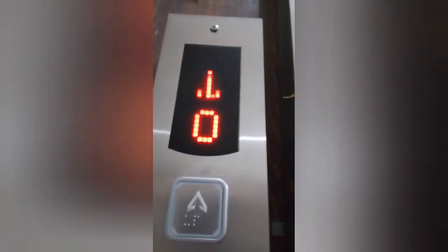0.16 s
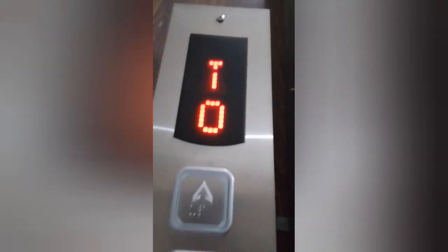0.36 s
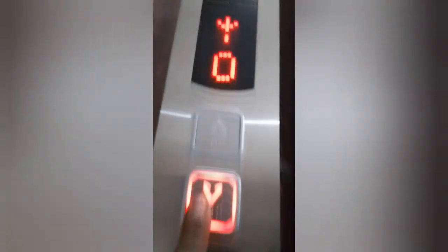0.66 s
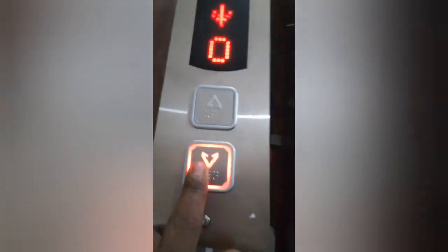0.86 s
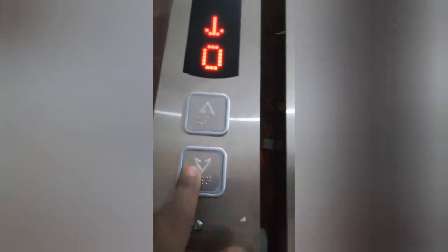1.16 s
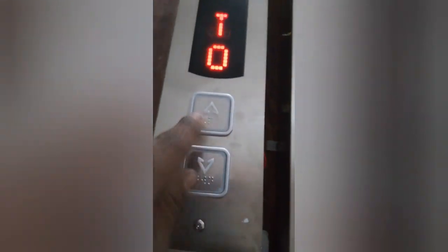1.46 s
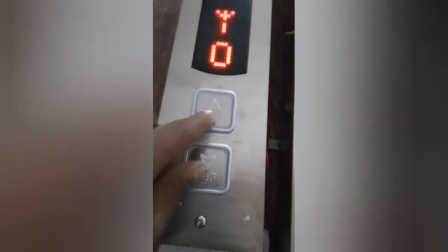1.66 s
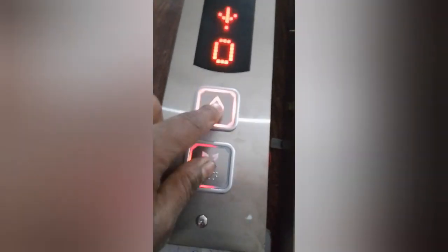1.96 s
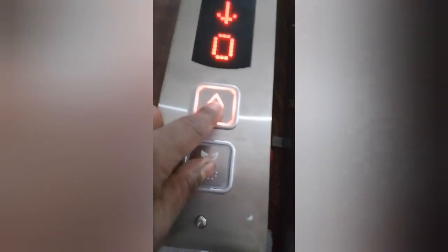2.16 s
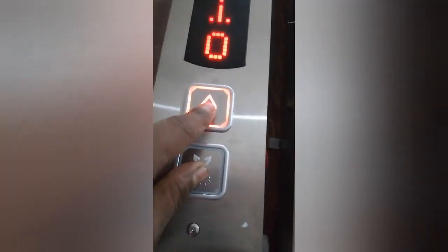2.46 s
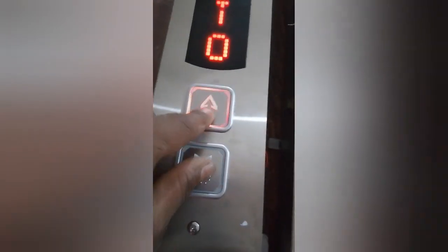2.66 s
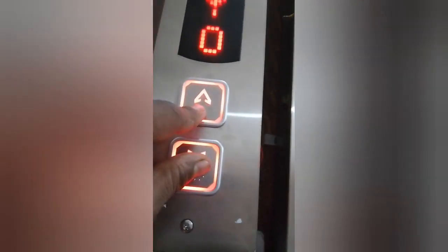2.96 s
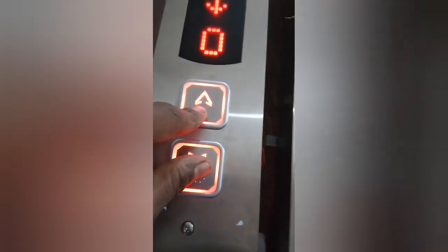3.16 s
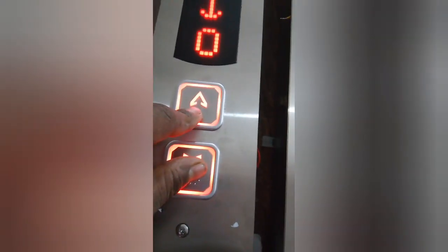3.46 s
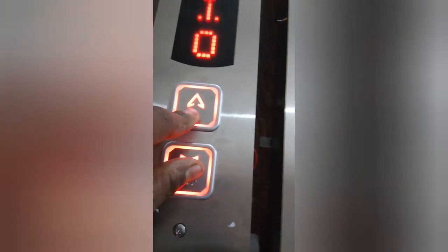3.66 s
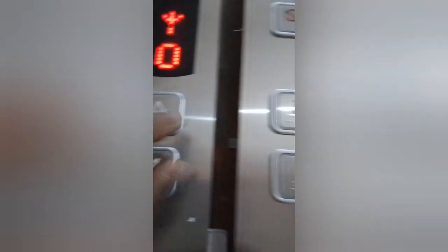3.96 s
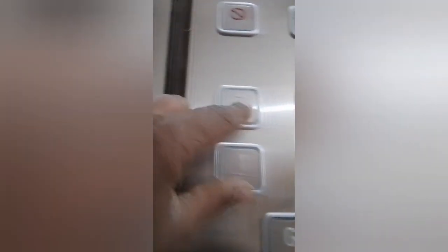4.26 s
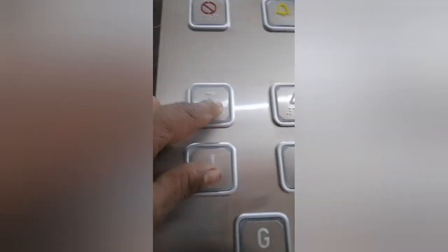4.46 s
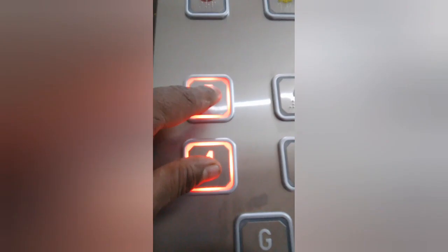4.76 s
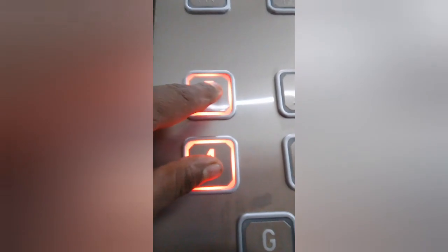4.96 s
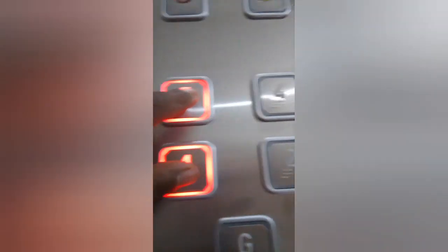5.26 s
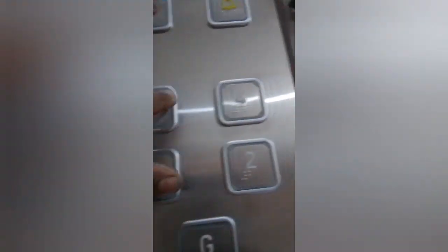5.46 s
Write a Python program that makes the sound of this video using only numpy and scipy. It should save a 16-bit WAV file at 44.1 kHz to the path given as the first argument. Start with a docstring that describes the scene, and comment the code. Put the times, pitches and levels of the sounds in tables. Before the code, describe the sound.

A phone held close in a small metal lift space hears a low, flickering rumble with faint thin whines during the first second or so. Soft dull thuds come at 0.2 to 0.6 s, then a tight group of hollow knocks at about 0.75 to 0.9 s. From 1.3 s heavier bumps build into the loudest clatter, a hard boxy bang near 1.46 s with rattling panels and ticking steel parts, and another sharp crack near 1.9 s, trailing off by 2.1 s. A low hum wavers underneath. From 2.2 s an engine outside growls, revs up around 2.55 s, and passes with swelling hissy road noise, strongest near 3.8 s, then sinks in pitch and fades by 4.2 s. A single tap falls at 2.8 s and a thump at 3.9 s. Wavering low hums follow, with light clicks, gritty rubs and small knocks from 4.6 s, ending in muffled thumps around 5.4 s.

```python
"""Door panels knock and judder in a small lift car: each blow is a push and rattle that rings steel modes.
The walls boom as shaken resonances, latches tick as high short modes, and gritty rubs are dense slips.
Outside an engine, built from multiples of its firing rate, revs, passes and drops away; its road noise,
coloured noise with whirring bands, swells. Low hums waver, and faint thin whines come and go early on.
All is heard by a phone held in the car."""
import sys
import numpy as np
from scipy import signal
from scipy.fft import rfft, irfft
from scipy.io import wavfile
from scipy.ndimage import uniform_filter1d

SR = 44100
rng = np.random.default_rng(int(sys.argv[2]) if len(sys.argv) > 2 else 0)


def master(y):
    """Save y as 16-bit WAV."""
    cut = np.clip(np.atleast_2d(y).T, -1, 1)
    pcm = np.round(cut * 32767)  # scale
    wavfile.write(sys.argv[1], SR, pcm.astype(np.int16))


N = 247708


def undb(db):
    """Level law: decibels to amplitude gain."""
    return 10 ** (np.asarray(db) / 20)


def unit(x):
    """Normalisation of power: scale to rms 1."""
    return x / np.sqrt(np.mean(x ** 2))


def columns(table, fade=0.036):
    """Linear interpolation: a curve table sample by sample, and a gate open over its span (fade in s)."""
    t = np.arange(N) / SR
    times, *values = np.transpose(table)
    gate = np.clip(np.minimum(t - times[0], times[-1] - t) / fade, 0, 1)
    return [np.interp(t, times, v) for v in values], gate


def window(start, end, fade):
    """Linear fades: a gate that opens after start and is shut by end, all in seconds."""
    t = np.arange(N) / SR
    return np.clip(np.minimum(t - start, end - t) / fade, 0, 1)


def walk(rate):
    """Smoothed random process: levels held 1 / rate seconds and slewed twice; spread near 1."""
    hold = int(SR / rate)
    steps = np.repeat(rng.standard_normal(N // hold + 1), hold)
    return 1.2 * uniform_filter1d(uniform_filter1d(steps, hold), hold)[:N]


def resonate(x, modes, top=1.52):
    """Modal superposition: two-pole resonances, neighbours in opposite sign, dulled above the last."""
    y = 0
    for k, (hz, width, db) in enumerate(modes):
        b, a = signal.iirpeak(hz, hz / width, fs=SR)  # gain 1 at the centre
        y = y + (-1) ** k * undb(db) * signal.lfilter(b, a, x)
    cutoff = min(top * modes[-1][0], .4 * SR)
    return signal.sosfilt(signal.butter(4, cutoff, fs=SR, output="sos"), y)


def coloured(spectrum, flicker_db, rate):
    """Spectral shaping: noise of the given colour whose octaves flicker independently."""
    hz = np.maximum(np.arange(N // 2 + 1) * SR / N, 1)
    f, db = np.transpose(spectrum)
    bins = rfft(rng.standard_normal(N)) * undb(np.interp(np.log(hz), np.log(f), db))
    total = 0
    for centre in 16 * 2. ** np.arange(11):
        share = np.clip(1 - np.abs(np.log2(hz / centre)), 0, 1)  # overlapping triangles on a log axis
        total = total + undb(flicker_db * walk(rate)) * irfft(bins * share, N)
    return unit(total)


def tone(hz, wobble, flutter_db):
    """Phase integration: a sine near rms 1 whose pitch and size shake a little."""
    phase = 2 * np.pi * np.cumsum(hz * (1 + wobble * walk(13))) / SR
    return np.sqrt(2) * undb(flutter_db * walk(25.1)) * np.sin(phase)


def strikes(times, db, t60, blow, modes):
    """Impulse excitation: each contact is a push and a dying rattle, ringing modes to the given peak."""
    out, t = np.zeros(N + SR), np.arange(SR // 3) / SR
    decay = np.exp(-np.log(1000) * t / np.clip(t60, .005, .4)[:, None])
    push = rng.standard_normal((len(times), len(t))) * decay
    push[:, 0] = blow * np.sqrt(np.sum(push ** 2, axis=1))  # the one sharp push, relative to the rattle
    rings = resonate(push, modes)
    for s, gain, ring in zip(times, undb(db), rings):
        out[int(s * SR):int(s * SR) + len(t)] += gain * ring / np.abs(ring).max()
    return out[:N]


# Spectrum of the air noise. Each row: frequency in Hz, relative density in dB per Hz.
AIR_SPECTRUM = [(35, -33), (60, 0.5), (163, -11.5), (350, -12), (1090, -24), (1470, -22.5), (1620, -21.5),
                (3030, -31.5), (6510, -47.5), (8590, -50.5), (15400, -83.5)]
AIR_DB = -46.5


def air():
    """Stationary broadband noise: a steady, mostly low bed whose octaves flicker."""
    return undb(AIR_DB) * coloured(AIR_SPECTRUM, 1.5, 6)


# Spectrum of the road hiss. Each row: frequency in Hz, relative density in dB per Hz.
HISS_SPECTRUM = [(590, -24.5), (1000, -21.5), (1240, -8.5), (1350, -3.5), (1770, -4), (2770, -5),
                 (3360, -9.5), (4370, -13.5), (7000, -29), (9100, -63.5), (15400, -120)]
# High bands of the fine hiss. Each row: frequency in Hz, width in Hz, relative gain in dB.
FINE_BANDS = [(8300, 1400, 0.5), (10400, 4400, -18), (14500, 2500, -28.5)]
FINE_DB, FINE_SLOPE = -69, 0.99  # level when near_db is 0; dB per dB of road


def road(road_db, near_db):
    """Broadband radiation: coloured hiss, with fine high noise that follows its level."""
    hiss = undb(road_db) * coloured(HISS_SPECTRUM, 1.0, 15)
    grain = undb(1.7 * walk(14)) * rng.standard_normal(N)
    fine = undb(FINE_DB + FINE_SLOPE * near_db) * unit(resonate(grain, FINE_BANDS))
    return hiss + fine


# Narrow bands in the hiss. Each row: start in seconds, end in seconds, frequency in Hz, width in Hz,
# level in dB. A row that ends before it starts is silent.
WHIRR_BANDS = [(2.96, 4.2, 1400, 59, -58), (4.4, 4.1, 2850, 120, -66), (3.7, 4.13, 1800, 200, -57),
               (3, 5.7, 2100, 72, -67), (2.6, 3.7, 2900, 130, -60.5), (2.4, 3.7, 3800, 200, -70),
               (3.4, 4.55, 6680, 120, -76), (4.75, 4.5, 2900, 350, -64)]


def whirr():
    """Narrowband filtering: resonant bands of noise that swell and fade."""
    out = 0
    for start, end, hz, width, db in WHIRR_BANDS:
        b, a = signal.iirpeak(hz, hz / width, fs=SR)
        band = unit(signal.lfilter(b, a, rng.standard_normal(N)))
        out = out + window(start, end, 0.11) * undb(db + 2.0 * walk(17)) * band
    return out


# Thin tones. Each row: start in seconds, end in seconds, pitch in Hz, level in dB.
WHINE_TONES = [(-.1, .88, 1503, -58.5), (-.1, 1.4, 2120, -70), (.1, .95, 2985, -72), (.95, 1.38, 2995, -70)]


def whine():
    """Pure tones with modulation: thin sines that flutter."""
    return sum(window(start, end, .05) * undb(db) * tone(hz, .0012, 1.5)
               for start, end, hz, db in WHINE_TONES)


# Low wavering hums, one table per note: near 130 Hz, later near 145 Hz with a higher one near 214 Hz.
# Each row: time in seconds, pitch in Hz, level in dB.
HUM_NOTES = [
    [(1.5, 128, -20), (1.6, 129.1, -47.5), (1.8, 129.5, -30.5), (1.87, 132.6, -27), (2.126, 130.2, -30),
     (2.2, 131, -41)],
    [(3.97, 174.6, -23), (4.1, 149.3, -48), (4.17, 139, -33.5), (4.32, 154.6, -26.5), (4.47, 140, -32),
     (4.54, 144.5, -38), (4.708, 148.1, -27.5), (4.85, 141.6, -34), (5.0, 140, -41)],
    [(4.05, 220.4, -45), (4.12, 215.4, -38), (4.24, 212.3, -47), (4.33, 214, -35.5), (4.42, 210, -46)],
]


def hum():
    """Frequency modulation: low notes that waver in pitch and level."""
    out = 0
    for note in HUM_NOTES:
        (hz, db), gate = columns(note)
        out = out + gate * undb(db) * tone(hz, 0.01015, 0.96)
    return out


# Engine orders. Each row: time in seconds, firing rate in Hz, levels in dB of multiples 2, 3, 4, 5, 6, 7
# and 9, and a base level in dB for the other upper ones.
ENGINE_ORDERS = [(2.2, 38.7, -51, -37, -47, -45, -25, -62, -69, -52),
                 (2.32, 36.4, -37, -41, -38.5, -57, -61, -49, -67, -46),
                 (2.408, 40.3, -56, -48, -33, -51, -43, -55, -47.5, -40.5),
                 (2.55, 46, -31.5, -58, -36.5, -46, -42, -72, -46, -54),
                 (2.572, 45.6, -28.5, -57, -36.5, -42, -39, -57, -56, -41),
                 (2.676, 44.5, -31.5, -56, -29, -42, -45, -46, -47, -43),
                 (2.71, 44.3, -38.5, -63, -35.5, -43, -42, -42, -40, -44),
                 (2.792, 42.2, -47, -46, -28.5, -33, -29.5, -70, -43.5, -42.5),
                 (2.95, 40.5, -45, -49, -36, -43, -37.5, -47, -47.5, -40),
                 (3.012, 40, -45, -38.5, -45, -32, -43, -48, -33.5, -37),
                 (3.14, 39, -42.5, -49, -38, -30, -33.5, -47, -41.5, -41.5),
                 (3.286, 40.6, -38, -54, -32, -28, -45, -46, -47, -47),
                 (3.39, 39.2, -34.5, -42, -39, -23, -56, -45, -38.5, -38),
                 (3.51, 39.16, -30, -36.5, -37, -21.5, -42, -48, -47, -41),
                 (3.604, 37.8, -30.5, -42, -61, -35.5, -61, -35.5, -50, -40),
                 (3.636, 37.98, -30, -46, -55, -34, -36, -39.5, -47, -41),
                 (3.698, 36.6, -32, -47, -39, -37, -36, -35.5, -39, -37.5),
                 (3.736, 37.3, -29, -44, -35, -30, -44, -53, -58, -44),
                 (3.812, 36.9, -30, -47, -35, -24.5, -39, -49, -55, -42),
                 (3.862, 36.2, -37, -46, -53, -34, -37.5, -61, -46.5, -43),
                 (4.038, 31.2, -51, -35, -36, -29, -39, -45, -51, -46),
                 (4.098, 25.8, -56, -62, -39, -34.5, -47, -47, -58, -57),
                 (4.19, 21, -50, -50, -41, -33, -44, -44, -62, -59)]
# Weaker upper multiples. Each row: multiple of the firing rate, level in dB relative to the base level.
UPPER_ORDERS = [(8, -10), (10, -12), (11, -13), (12, -14), (13, -15)]
PITCH_DRIFT, FLUTTER_DB = .0012, .13  # fraction of pitch; dB per multiple
WANDER_DB, WANDER_PER_S = 4, 8
GEAR_DB, GEAR_SLOPE = -58.5, 1.1  # level when near_db is 0, on throttle; dB per dB of road
GEAR_LOADED_HZ, GEAR_DROP_DB_PER_HZ = 37.8, 6  # off throttle, under this firing rate, the gears quieten
GEAR_WOBBLE, GEAR_ROUGH_PER_S = .005, 160  # drift as a fraction of pitch; rate of the rough shaking


def engine(near_db):
    """Harmonic series: multiples of the firing rate, the 36th a gear whine; weak ones wander with the path."""
    (hz, *clear_db, upper_db), gate = columns(ENGINE_ORDERS)
    teeth, clear = 36, (2, 3, 4, 5, 6, 7, 9)
    strong = sum(undb(db) * tone(k * hz, PITCH_DRIFT, FLUTTER_DB * k) for k, db in zip(clear, clear_db))
    weak = 0
    for k, relative_db in UPPER_ORDERS:
        level_db = upper_db + relative_db + WANDER_DB * walk(WANDER_PER_S)
        weak = weak + undb(level_db) * tone(round(k) * hz, PITCH_DRIFT, FLUTTER_DB * k)
    mesh = (1 + 0.76 * walk(GEAR_ROUGH_PER_S)) * tone(teeth * hz, GEAR_WOBBLE, 1.4)
    octave = undb(-1.0) * walk(2 * GEAR_ROUGH_PER_S) * tone(2 * teeth * hz, GEAR_WOBBLE, 1.5)
    off_throttle_db = GEAR_DROP_DB_PER_HZ * np.maximum(GEAR_LOADED_HZ - hz, 0)
    gear_db = GEAR_DB + GEAR_SLOPE * near_db - off_throttle_db
    return gate * (strong + weak + undb(gear_db) * (mesh + octave))


# How hard the car shakes. Each row: time in seconds, wall boom in dB before its shares, door judder in dB.
SHAKE_CURVE = [(0, -41.5, -50), (.64, -41, -52.5), (.88, -32, -41), (1.19, -35, -50.5), (1.42, -27, -43),
               (1.58, -24.5, -27.5), (1.76, -28, -37), (1.86, -23.5, -39), (1.91, -20.5, -29),
               (2.17, -32, -41), (2.35, -36.5, -48.5), (2.74, -38, -44.5), (3.17, -41.5, -45.5),
               (3.5, -45, -42), (3.79, -28.5, -42.5), (3.93, -49, -45.5), (4.22, -33, -47),
               (4.63, -38.5, -49.5), (4.75, -30, -43.5), (5.3, -31.5, -40.5), (5.38, -24.5, -43),
               (5.45, -29.5, -41), (5.62, -32.5, -46.5)]
# Modes of shaft, walls and door panels. Each row: frequency in Hz, width in Hz, relative gain in dB.
SHAFT_MODES = [(47.7, 31, 0)]
WALL_MODES = [(82.7, 7.4, -11.5), (145, 27.5, -3.5), (173.7, 29, 5), (253.3, 45.6, 1.5), (326, 78, -8.5)]
PANEL_MODES = [(467, 105, 7), (655, 55, 9), (737, 86, 8.5), (935, 173, 5.5), (1115, 175, 5),
               (1394, 183, 1.5), (1544, 185, 0.5), (1822, 140, -6), (2167, 250, -10.5)]
DEEP_DB, UPPER_DB = -5.5, -3  # shares of the boom: two lowest wall modes, the rest
SHAFT_DB, SHAFT_SWING_DB = -49, 1


def car():
    """Forced vibration: rollers on uneven rails shake shaft and walls, and the panels in dense small jolts."""
    (boom_db, judder_db), _ = columns(SHAKE_CURVE)
    shake = undb(1.5 * walk(35)) * rng.standard_normal((3, N))
    levels = SHAFT_DB + SHAFT_SWING_DB * walk(4.4), boom_db + DEEP_DB, boom_db + UPPER_DB
    bodies = SHAFT_MODES, WALL_MODES[:2], WALL_MODES[2:]
    boom = sum(undb(db) * unit(resonate(x, modes)) for db, x, modes in zip(levels, shake, bodies))
    jolts = rng.standard_normal(N) * undb(1.8 * walk(90))
    return boom + undb(judder_db) * unit(resonate(jolts, PANEL_MODES))


# Gritty rubs, a runner or a hand on the panel. Each row: start in seconds, hold in seconds, level in dB.
RUBS = [(0.806, 0.034, -59.5), (1.503, 0.021, -51.5), (1.877, 0.022, -50), (4.792, 0.12, -49),
        (4.938, 0.15, -54), (5.166, 0.061, -51)]
# Modes of the rubbed sheet. Each row: frequency in Hz, width in Hz, relative gain in dB.
GRIT_MODES = [(1490, 270, -9), (2160, 260, 2), (2450, 200, 3), (2820, 370, -2), (4370, 710, -14),
              (5500, 1000, -16)]
SLIPS_PER_S, SLIP_SPREAD_DB = 1500, 2.0
RUB_ATTACK_S, RUB_FALL_DB_PER_S = 0.03, 90


def rub():
    """Stick-slip friction: dense uneven slips ring the sheet; each rub swells, holds and dies away."""
    t = np.arange(N) / SR
    force = 0
    for start, hold, db in RUBS:
        swell = np.clip((t - start) / RUB_ATTACK_S, 0, 1)
        fall_db = RUB_FALL_DB_PER_S * np.maximum(t - start - RUB_ATTACK_S - hold, 0)
        force = force + swell * undb(db - fall_db)
    size = undb(SLIP_SPREAD_DB * rng.exponential(size=N)) * rng.standard_normal(N)
    slips = (rng.random(N) < SLIPS_PER_S / SR) * size
    return force * unit(resonate(slips, GRIT_MODES))


# Each row: start in seconds, peak of the upper latch modes in dB, t60 of the rattle in seconds,
# broad scrape relative to that peak in dB, lower latch modes relative to that peak in dB.
TICK_EVENTS = [(1.4, -61.5, 0.093, 14.5, 0), (1.441, -54.5, 0.035, 13.5, 2), (1.4646, -54, 0.026, 3, 0),
               (1.543, -48, 0.09, 11, 4), (1.56, -49, 0.076, 2, 1), (1.5864, -46, 0.04, -3, 4),
               (1.619, -48, 0.069, 4, 7), (1.645, -52, .05, 4, -1), (2.03, -42.5, 0.038, -4, 1),
               (2.067, -40.5, 0.041, -6, 4), (2.798, -45, .03, -3, -11), (4.6397, -58, .03, 6, 4),
               (4.7275, -59, .03, 4, 4), (4.8077, -63, 0.056, 11, 4), (4.8387, -57, 0.052, 12, 19),
               (4.9302, -55, 0.069, 7, 3), (4.955, -43.5, 0.023, 0, 4), (5.0445, -56, .05, 2, 10),
               (5.108, -56, .04, 2, 6), (5.176, -52, .05, -3, 11), (5.338, -56, .04, 0, 7),
               (5.4304, -57, .03, 2, 0), (5.488, -55.5, .03, 5, 3)]
# Modes of a free latch. Each row: frequency in Hz, relative level in dB, t60 in seconds before holding.
LATCH_MODES = [(2440, 6, 0.11), (2590, 7, 0.051), (2880, -15, 0.15), (3280, -12, 0.092), (3700, -3, 0.046),
               (6050, -11, 0.08), (7197, -10, 0.045), (7900, -13, 0.04), (8300, -9, 0.035),
               (8700, -10, 0.03), (9318, -18, 0.03), (10600, -29, 0.012), (14000, -35, 0.02)]
# Bands of the scrape. Each row: frequency in Hz, width in Hz, relative gain in dB.
SCRAPE_BANDS = [(4140, 770, 8.5), (6700, 1600, -5.5), (7660, 770, -5), (11300, 3400, -31),
                (14000, 2500, -29)]
HELD, SCRAPE_LONGER = 2.2, 2.5  # held parts ring this much shorter; a scrape outlasts its click


def ticks():
    """Damped high modes: small steel parts click, scrape and ring, bandwidth inverse to decay time."""
    s, peak_db, t60, scrape_db, lower_db = np.transpose(TICK_EVENTS)
    modes = [(hz, HELD * np.log(1000) / np.pi / decay, db - 10 * np.log10(decay))
             for hz, db, decay in LATCH_MODES]
    upper = strikes(s, peak_db, t60, 0.25, modes[5:])
    lower = strikes(s, peak_db + lower_db, t60, 0.72, modes[:5])
    scrape = strikes(s, peak_db + scrape_db, SCRAPE_LONGER * t60, 0.11, SCRAPE_BANDS)
    return upper + lower + scrape


CLEAR_RISE_S = .006


def notes(times, db, t60, hz):
    """Free decay: a single mode swells quickly and rings clear."""
    out, t = np.zeros(N + SR), np.arange(SR // 3) / SR
    for s, gain, ring_s, f in zip(times, undb(db), np.clip(t60, .02, .3), hz):
        shape = (1 - np.exp(-t / CLEAR_RISE_S)) * np.exp(-np.log(1000) * t / ring_s)
        out[int(s * SR):int(s * SR) + len(t)] += gain * shape / shape.max() * np.sin(2 * np.pi * f * t)
    return out[:N]


# Each row: start in seconds, panel ring in dB before shares and lean, wall thud in dB before its shares,
# wall modes most struck (0 low, 1 middle, 2 high), edge crack peak in dB, base t60 in seconds
# that each part scales.
KNOCK_EVENTS = [(0.247, -62, -47, -1, -64, 0.23), (0.389, -64, -30.5, 1.23, -46, 0.59),
                (0.622, -61, -32, 0.3, -62, 0.48), (0.746, -34, -16.5, 1.6, -55, 0.12),
                (0.774, -22.5, -11.5, 1.17, -35, 0.17), (0.799, -30, -19.5, 2.2, -44, 0.15),
                (0.842, -26, -17.5, 1.4, -46, 0.21), (0.892, -39, -25, 1.3, -45, 0.06),
                (1.071, -41, -28, -0.2, -64, 0.14), (1.222, -60, -26, 0.5, -64, 0.19),
                (1.324, -43, -19.5, 1.9, -63, 0.074), (1.364, -46, -17, 1.5, -60, 0.064),
                (1.4, -24.5, -32, 2.7, -45, 0.16), (1.44, -19.5, -30, 2, -36, 0.04),
                (1.464, -7.5, -8.5, 1.7, -27, 0.1), (1.51, -14, -15, 1.9, -54, 0.18),
                (1.535, -20, -9.5, 1.7, -48, 0.079), (1.582, -22, -15, 2.5, -39, 0.082),
                (1.603, -30, -15.5, -0.5, -48, 0.11), (1.626, -36, -14, 1.5, -34, .094),
                (1.668, -19, -15.5, 2.8, -48, 0.07), (1.693, -16.5, -14, 1.65, -34, 0.19),
                (1.728, -32, -16, 0.75, -50, 0.16), (1.771, -27.5, -17.5, 2, -51, 0.12),
                (1.876, -13.5, -12.5, 2, -19.5, 0.092), (1.899, -15, -12, 2.35, -28, 0.26),
                (1.94, -32, -10.5, 1.55, -38, 0.11), (1.966, -27, -22, 1.5, -37, 0.47),
                (1.984, -40, -30, 0, -55, .15), (2.03, -19.5, -16, 1.43, -51, 0.23),
                (2.064, -33, -21, 2.5, -46, 0.096), (2.101, -33, -22, 0.6, -52, 0.13),
                (2.798, -28, -31, 1, -49, 0.088), (3.899, -32, -19, 0.4, -52, 0.077),
                (3.978, -25, -34, 5, -36, 0.12), (4.639, -29, -28, 1.5, -37, 0.24),
                (4.73, -29.5, -22.5, 1.56, -38.5, 0.17), (4.898, -29, -30, 1.5, -38, 0.14),
                (5.173, -26.5, -32, 0, -33, 0.07), (5.39, -61, -20.5, 0.92, -58, 0.11),
                (5.428, -56, -22.5, 2.2, -44, 0.14), (5.46, -56, -23.5, 2.2, -55, 0.2)]
# Single modes that ring clear of a knock. Each row: start in seconds, frequency in Hz, peak in dB,
# t60 in seconds before limits.
PING_EVENTS = [(0.251, 96, -31.5, 0.39), (.774, 750, -32.5, 0.1), (.774, 1200, -39, .08),
               (.818, 830, -38, 0.13), (.865, 875, -38, 0.19), (1.2, 81, -33, 0.33), (1.301, 76, -27, 0.35),
               (1.464, 1133, -27, .06), (1.722, 492, -28, 0.067), (1.741, 87.4, -32, 0.25),
               (1.768, 470, -28.5, 0.087), (2.029, 443, -28.5, .1), (2.066, 453, -29, 0.07),
               (2.66, 428, -33, 0.14), (2.798, 430, -31, 0.079), (3.978, 439, -35.5, 0.095),
               (4.68, 55, -32, .3), (5.173, 2710, -41, .04), (5.31, 2700, -49, .06)]
# Modes of the door edge. Each row: frequency in Hz, width in Hz, relative gain in dB.
EDGE_MODES = [(1610, 1200, 12.5), (2400, 560, 25), (3100, 740, 20.5), (4340, 1370, 9), (6400, 2000, -19.5)]
HARDNESS = 0.62  # sharp push against rattle for a ring of -17.5 dB
AWAY_DB = 10.5  # loss per squared step away from the modes most struck
CLEAR_DB, RATTLE_DB, CLEAR_SHORTER = -1, -6, 0.6  # shares of a thud; length of its clear note
BRIGHTER = 0.58  # dB of tilt toward the upper panel modes per dB of blow
RING_LONGER = 1.25  # the panels outlast the thud


def knocks():
    """Modal impact response: a blow rings walls and panels, and cracks briefly at the edge."""
    s, ring_db, thud_db, place, edge_db, t60 = np.transpose(KNOCK_EVENTS)
    hard = HARDNESS * undb(.5 * (ring_db + 17.5))  # the stronger the blow, the more is one sharp push
    heavy = np.maximum(0.76 * hard, 0.4)
    groups = WALL_MODES[:2], WALL_MODES[2:3], WALL_MODES[3:]
    rattle = sum(strikes(s, thud_db - AWAY_DB * (place - k) ** 2, t60, heavy, modes)
                 for k, modes in enumerate(groups))
    clear_hz = np.interp(place, range(4), np.transpose(WALL_MODES)[0, 1:])
    clear = notes(s, thud_db + CLEAR_DB, CLEAR_SHORTER * t60, clear_hz)
    thud = undb(RATTLE_DB) * rattle + clear
    lean_db = BRIGHTER * (ring_db + 21.5) / 2
    low_ring = strikes(s, ring_db - 8.5 - lean_db, RING_LONGER * t60, hard, PANEL_MODES[:3])
    high_ring = strikes(s, ring_db - 7.0 + lean_db, RING_LONGER * t60, hard, PANEL_MODES[3:])
    edge = strikes(s, edge_db, 0.55 * t60, 0.72, EDGE_MODES)
    when, hz, ping_db, ping_s = np.transpose(PING_EVENTS)
    return notes(when, ping_db, ping_s, hz) + thud + low_ring + high_ring + edge


# Level of the road hiss. Each row: time in seconds, level in dB.
ROAD_CURVE = [(0, -57), (.64, -63), (.86, -52), (1.19, -67), (1.45, -55), (1.61, -48), (1.78, -56),
              (1.94, -53.5), (2.3, -57), (2.61, -51.5), (3.03, -50.5), (3.3, -47), (3.8, -44.5), (4.1, -50),
              (4.41, -49.5), (4.7, -55.5), (5.08, -49), (5.32, -49), (5.45, -54), (5.62, -61.5)]
ROAD_MID_DB = -50  # road level at which near_db is 0


def scene():
    """Linear superposition: all sources add at the one microphone."""
    (road_db,), _ = columns(ROAD_CURVE)
    near_db = road_db - ROAD_MID_DB
    outside = air() + road(road_db, near_db) + whirr() + whine() + hum() + engine(near_db)
    inside = car() + rub() + ticks() + knocks()
    return (outside + inside)[None]


TOP_HZ, OFFSET = 15500, .0094  # low-pass edge; constant offset at full scale 1


def record(dry):
    """Band limitation: the phone cuts the top and adds a small constant offset."""
    return signal.sosfilt(signal.ellip(12, .2, 70, TOP_HZ, fs=SR, output="sos"), dry) + OFFSET


dry = scene()
out = record(dry)
master(out)
```